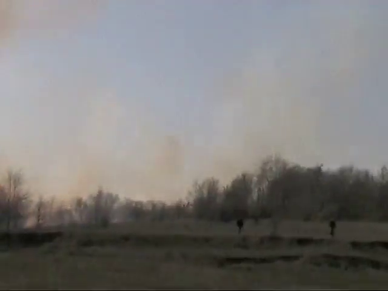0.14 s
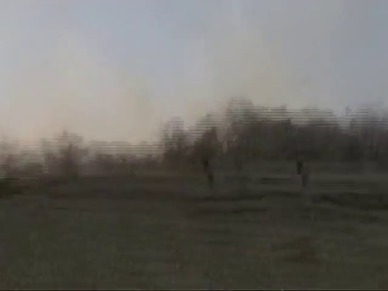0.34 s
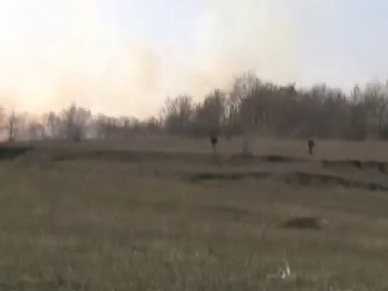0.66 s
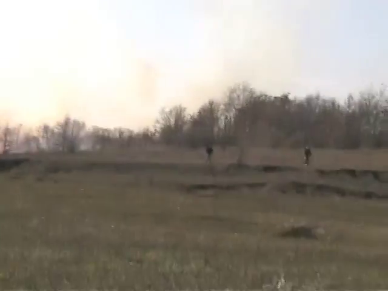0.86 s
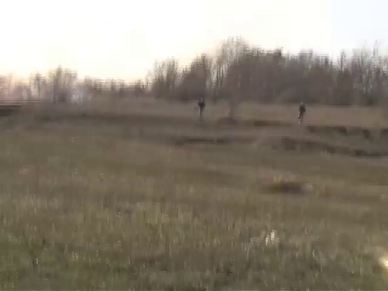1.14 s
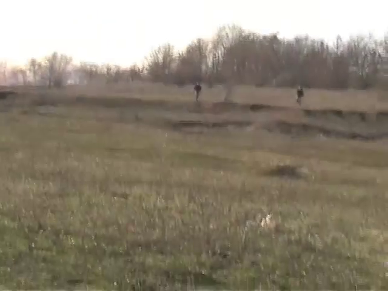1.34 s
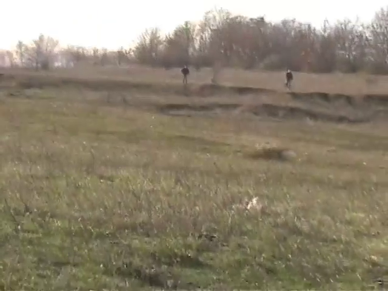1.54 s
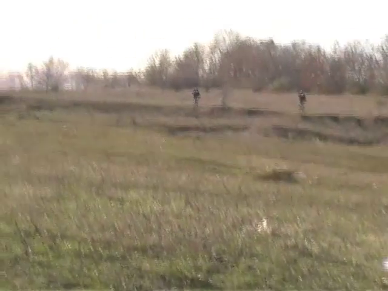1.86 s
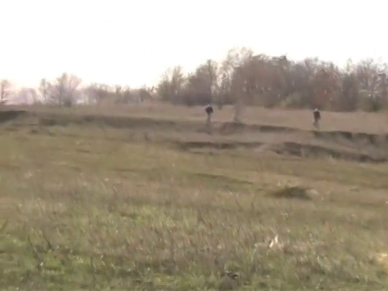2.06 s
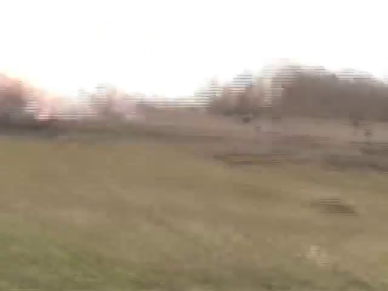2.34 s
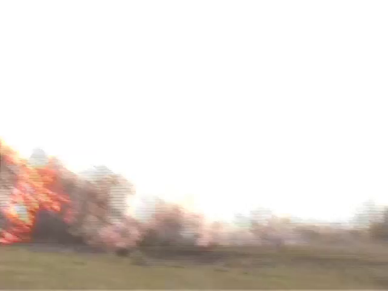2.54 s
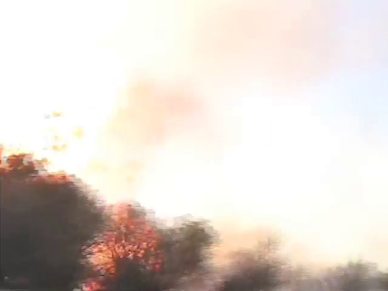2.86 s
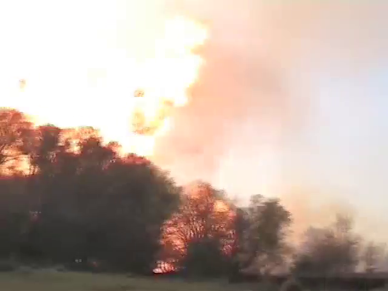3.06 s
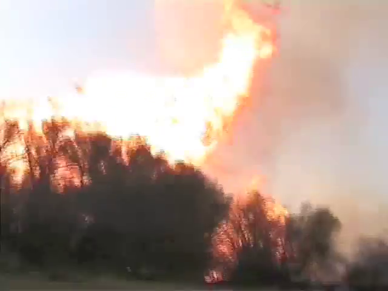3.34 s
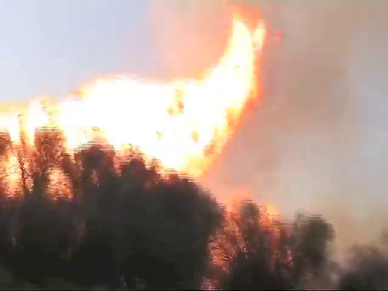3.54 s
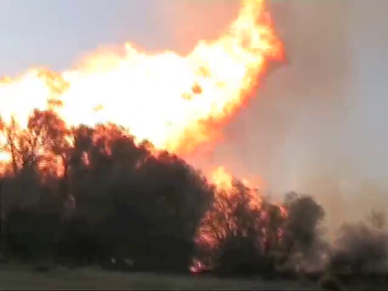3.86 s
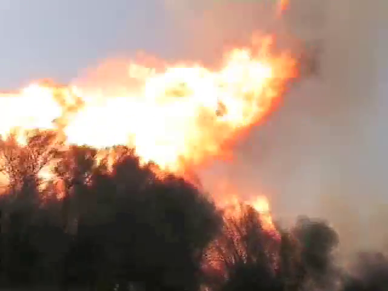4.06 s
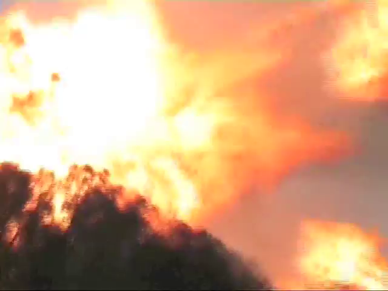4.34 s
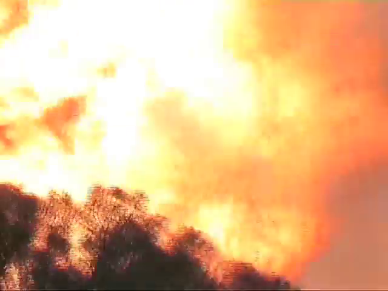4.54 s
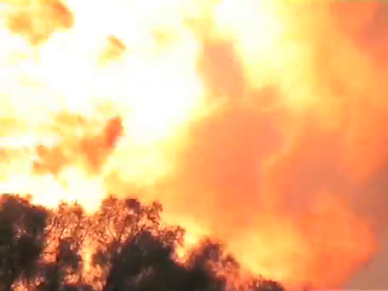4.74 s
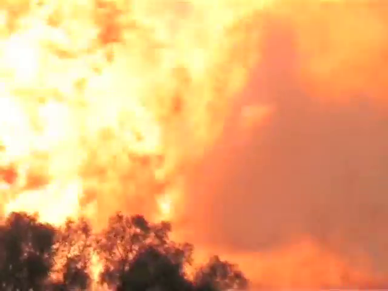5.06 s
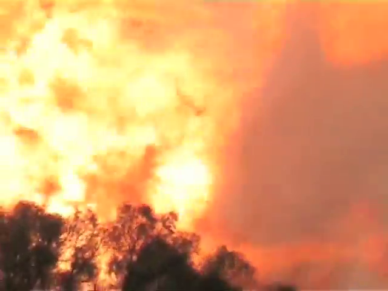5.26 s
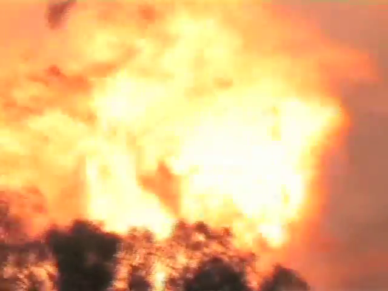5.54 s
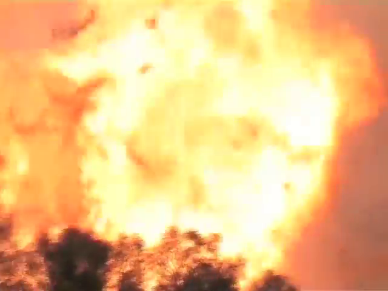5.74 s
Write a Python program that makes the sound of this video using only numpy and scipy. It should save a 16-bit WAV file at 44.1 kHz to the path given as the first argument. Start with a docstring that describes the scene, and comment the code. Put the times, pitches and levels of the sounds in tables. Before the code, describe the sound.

A huge gas fire burns behind trees across an open field, heard through a hand-held camcorder. From 0 s there is a loud, deep, turbulent roar, mostly low and low-mid, constantly fluttering with small surges, lulls and dull bursts. It is dry and wide, with the bass rumble leaning left. A rougher mid-range gas rush sits underneath, softening a little until about 1.5-2 s. A very faint, thin camera-motor whine and slight hiss lie behind. Around 2.6 s the camera swings to the flames: the rush brightens and the whine rises slightly. The roar stays steady with quick swells through 3-4.2 s. Near 4.4 s the level fades almost to silence and straight back, in just over a tenth of a second. At 4.64 s a sharp, bright, crackly click with a tiny ring snaps close to the microphone. The roar, now with more rush, continues to the end at about 6 s.

```python
"""A huge gas fire behind a line of trees, heard across an open field on a hand-held camcorder.
From the start turbulent eddies make a surging roar, roughened by small flame bursts, over a faint motor whine.
Near 2.6 s the camera turns to face the flames: the gas jet's rush, shaped from noise, brightens the sound
and the whine, made of wavering sine tones, rises. Near 4.4 s the level drops out briefly;
at 4.6 s a sharp click of noise cracks and a short ring sounds close to the microphone."""
import sys
import numpy as np
from scipy import signal
from scipy.fft import rfft, irfft
from scipy.io import wavfile
from scipy.ndimage import uniform_filter1d, minimum_filter1d

SR = 44100
rng = np.random.default_rng(int(sys.argv[2]) if len(sys.argv) > 2 else 0)


def master_out(mix):
    """Clip the mix to full scale and print it as 16-bit PCM to the path in sys.argv[1]."""
    frames = np.transpose(np.atleast_2d(mix))
    ceiling = np.clip(frames, -1, 1)
    pcm = np.round(ceiling * 32767).astype(np.int16)
    wavfile.write(sys.argv[1], SR, pcm)


N = 259997  # samples, about 5.9 s
TIME = np.arange(N) / SR  # s
FREQ = np.maximum(np.arange(N // 2 + 1) * SR / N, 1)  # Hz, kept above zero for the logarithms

TURN_AT_S, TURN_S = 2.56, 0.3  # the camera swings round to the fire: middle and length of the swing
DROP_AT_S = 4.4195  # lowest point of the dropout


def undb(db):
    """Decibels to gain."""
    return 10 ** (np.asarray(db) / 20)


def unit(x):
    """Scale to rms 1."""
    return x / np.sqrt(np.mean(x ** 2))


def noise():
    """White noise."""
    return rng.standard_normal(N)


def shape(points):
    """Gain at every frequency from (Hz, dB) points, joined on a logarithmic frequency axis."""
    hz, db = np.transpose(points)
    return undb(np.interp(np.log(FREQ), np.log(hz), db))


def filtered(x, response):
    """Pass a sound through a frequency response."""
    return irfft(rfft(x) * response, N)


def walk(rate_hz):
    """Random levels held for 1 / rate_hz seconds and smoothed twice, at rms 1."""
    hold = int(SR / rate_hz)
    steps = np.repeat(rng.standard_normal(N // hold + 1), hold)
    smooth = uniform_filter1d(uniform_filter1d(steps, hold), hold)
    return unit(smooth[:N])


def bursts(per_s, spread_db):
    """Pressure kicks of random time, sign and size: many small and a few large."""
    size = undb(spread_db * np.minimum(rng.exponential(size=N), 4))
    happens = rng.random(N) < per_s / SR
    return unit(happens * size * np.sign(noise()))


def turbulence(x, flicker_db, flicker_hz, count=10):
    """Eddies of each size swell on their own: every octave from 30 Hz up flickers in level."""
    spectrum, out = rfft(x), 0
    octave = np.clip(np.log2(FREQ / 30), 0, count - 1)
    for k in range(count):
        overlap = np.maximum(1 - np.abs(octave - k), 0)  # neighbouring bands crossfade
        band = irfft(spectrum * overlap, N)
        out = out + band * undb(flicker_db * walk(flicker_hz))
    return out


def turned():
    """How far the camera has swung towards the fire, 0 to 1."""
    return np.clip((TIME - TURN_AT_S) / TURN_S + 0.5, 0, 1)


def hiss(hiss_db=-73.0, whistle_db=-90, scan_hz=15625, whistle_width_hz=60):
    """Faint self-noise of each microphone channel, and a narrow whistle from the camera's line scan."""
    resonance = 1 / (1 + ((FREQ - scan_hz) / whistle_width_hz) ** 2)
    whistle = unit(filtered(noise(), resonance))
    return undb(hiss_db) * np.array([noise(), noise()]) + undb(whistle_db) * whistle


def motor(waver_hz=12, flutter_db=1.5, whine_db=-7.5, turn_db=9.5):
    """The camera's mechanism whines in thin wavering tones, stronger once the camera has swung round."""
    # Each row: a tone's frequency in Hz, level in dB ahead of the whine's gain,
    # change in dB from the dropout's lowest point on.
    motor_tones = [(1754, -59.5, 3), (4040, -85.5, 0.5), (4593, -77.5, -2), (5170, -84, 3.5),
                   (5399, -87, 6), (7900, -97.5, 2)]
    out, shifted = 0, TIME > DROP_AT_S
    for hz, db, change_db in motor_tones:
        phase = 2 * np.pi * np.cumsum(hz + waver_hz * walk(110)) / SR
        level = undb(db + change_db * shifted + flutter_db * walk(33))
        out = out + level * np.sqrt(2) * np.sin(phase)
    return out * undb(whine_db + turn_db * turned())


def click(snap_s=0.00088, tail_s=0.005, tail_db=-16.5, wide_hz=6000, ring_hz=3950, ring_s=0.0023, ring_db=-6):
    """Something small snaps near the microphone: cracks with short tails and a brief ring, wide in the treble."""
    # The snaps that make up the click. Each row: start in seconds, level in dB.
    snaps = [(4.6395, -23.5), (4.6413, -24.5), (4.6428, -25.5)]
    # Colour of the cracks. Each row: frequency in Hz, relative level in dB.
    crack_colour = [(800, -10), (2700, 2.5), (3400, -3.5), (4000, 2.5), (4700, -3), (5900, -2.5),
                    (7500, -13.5), (8500, -16.5), (10000, -13.5), (11800, -20), (13000, -37), (16000, -37)]
    envelope, ring = 0, 0
    for start, db in snaps:
        age = np.maximum(TIME - start, 0)
        size = (TIME >= start) * undb(db)
        envelope = envelope + size * (np.exp(-age / snap_s) + undb(tail_db) * np.exp(-age / tail_s))
        ring = ring + size * (1 - np.exp(-2 * age / snap_s)) * np.exp(-age / ring_s)
    colour = unit(shape(crack_colour))
    apart = 1 / (1 + (wide_hz / FREQ) ** 4)  # the two channels part company towards the treble
    mid = filtered(envelope * noise(), colour * np.sqrt(1 - apart / 2))
    side = filtered(envelope * noise(), colour * np.sqrt(apart / 2))
    tone = undb(ring_db) * ring * np.sin(2 * np.pi * ring_hz * TIME)
    return np.array([mid + side, mid - side]) + tone


def rush():
    """The gas jet: a rush roughened by a dense crackle of small shocks."""
    # Colour of the jet, dulled by distance. Each row: frequency in Hz, relative level in dB.
    jet_colour = [(300, -0.5), (700, 5), (1350, 3), (1650, -3.5), (2150, -5.5), (2600, -14), (3000, -22),
                  (3500, -30.5), (4400, -42), (5000, -43.5), (6300, -45), (7500, -57.5), (15000, -74.5)]
    drive = noise() + undb(-2) * bursts(per_s=500, spread_db=0.5)
    return unit(filtered(turbulence(drive, flicker_db=0.5, flicker_hz=16), shape(jet_colour)))


def surges():
    """The plume swells and sags: each surge or lull is a smooth bump in level."""
    # Surges (+) and lulls (-) of the plume, some barely noticeable. Each row: middle in seconds,
    # length in seconds at half the change, level change in dB.
    swells = [(0.347, 0.043, 3), (0.459, 0.073, 0.5), (0.652, 0.039, -3), (0.883, 0.055, -2),
              (1.029, 0.073, 1), (1.211, 0.042, -1.1), (1.488, 0.062, 1), (1.602, 0.08, -1),
              (1.868, 0.062, -1.6), (2.504, 0.05, -2.2), (2.66, 0.064, 1.5), (2.744, 0.037, 1),
              (2.913, 0.086, 0), (3.154, 0.1, 1.5), (3.274, 0.066, -1.5), (3.394, 0.054, 1.5),
              (3.571, 0.05, 2.2), (3.633, 0.034, -2), (3.98, 0.073, -1.7), (4.111, 0.034, -3.5),
              (4.208, 0.11, 1.5), (4.561, 0.038, 0.5), (4.722, 0.037, 1)]
    return undb(sum(db * 0.5 ** ((2 * (TIME - at) / length) ** 2) for at, length, db in swells))


def roar():
    """The burning plume: a deep turbulent roar with dull thuds of igniting gas pockets."""
    # Colour of the plume across the field. Each row: frequency in Hz, relative level in dB.
    plume_colour = [(20, -45.5), (45, -20.5), (90, -6.5), (135, -3.5), (180, 1), (250, 2), (420, -2.5),
                    (540, -4.5), (780, -9.5), (950, -16), (1400, -29), (1900, -33), (2200, -35.5),
                    (3200, -48.5), (5000, -81)]
    drive = noise() + undb(-10) * bursts(per_s=300, spread_db=1.0)
    return unit(filtered(turbulence(drive, flicker_db=0.96, flicker_hz=13), shape(plume_colour)))


def fire(roar_db=-13.5, roar_db_per_s=-0.1536):
    """The deep roar, from any direction and slowly easing off, with the rush that depends on the camera's aim."""
    # The jet's rush, loudest when the camera faces the flames. Each row: time in seconds, level in dB.
    rush_level = [(0, -27), (1.4, -34), (2.1, -32.5), (2.6, -29), (3.4, -29.5), (4.7, -24.5), (5.9, -23.5)]
    rush_db = np.interp(TIME, *np.transpose(rush_level))
    plume = undb(roar_db + roar_db_per_s * TIME) * surges() * roar()
    return plume + undb(rush_db) * rush()


def stereo(mid, lag_s=0.00035, lean_db=-4.5, lean_turn_db=-2, air_hz=110, air_db=-37.0):
    """Two close microphone ports: their difference is boosted in the bass, so the rumble leans left and spreads."""
    # Difference between the ports relative to their sum. Each row: frequency in Hz, level in dB
    # ahead of the lean's gain.
    port_difference = [(25, 17.5), (55, 14), (95, 7), (140, -2), (210, -7.5), (340, -14), (450, -27.5),
                       (600, -42), (1500, -46)]
    lag = np.exp(-2j * np.pi * FREQ * lag_s)
    lean = filtered(mid, shape(port_difference) * lag) * undb(lean_db + lean_turn_db * turned())
    # moving air: low noise, opposite at the two ports
    air_colour = FREQ / (air_hz + FREQ) / (1 + (FREQ / air_hz) ** 4)
    air = unit(filtered(noise(), air_colour))
    side = lean + undb(air_db) * air
    return np.array([mid + side, mid - side])


def soft_ends():
    """Gain that opens and closes smoothly over the first and last 4 ms."""
    return signal.windows.tukey(N, 2 * 0.004 * SR / N)


def limiter(x, ceiling=0.87, size=300):
    """Eases the gain of both channels down around peaks that pass the ceiling; size is in samples."""
    need = ceiling / np.maximum(np.abs(x).max(axis=0), ceiling)
    held = minimum_filter1d(need, 2 * size)
    return x * uniform_filter1d(uniform_filter1d(held, size), size)


def dropout(fall_s=0.087, rise_s=0.048, depth_db=-38, curve=1.3):
    """Gain that fades almost to silence and straight back."""
    away = np.maximum((DROP_AT_S - TIME) / fall_s, (TIME - DROP_AT_S) / rise_s)
    return undb(depth_db) + (1 - undb(depth_db)) * np.minimum(away, 1) ** curve


def scene():
    """The fire is far off across the field; the click and the camera's whine are close by."""
    return stereo(fire() + motor()) + click() + hiss()


def record(dry, feedback=0.5, depth=1.0, comb_hz=299.2, top_hz=15700):
    """The camcorder's comb notches out multiples of its motor hum, then limiter, dropout and treble cut act."""
    delay = np.exp(-2j * np.pi * FREQ / comb_hz)
    r = np.clip(feedback, 0, 0.9)  # more feedback makes narrower notches
    hum_band = (1 - r) / 2 * (1 + delay) / (1 - r * delay)
    notched = filtered(dry * soft_ends(), 1 - min(depth, 1) * hum_band)
    out = limiter(notched) * dropout()
    treble_cut = signal.ellip(8, 0.2, 70, top_hz, fs=SR, output="sos")
    return signal.sosfilt(treble_cut, out)


dry = scene()
out = record(dry)
master_out(out)
```